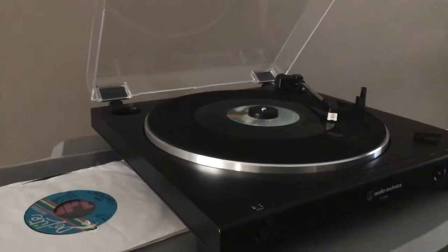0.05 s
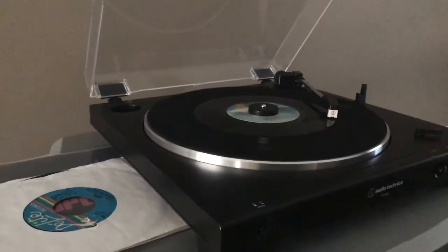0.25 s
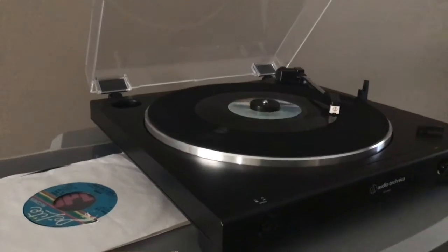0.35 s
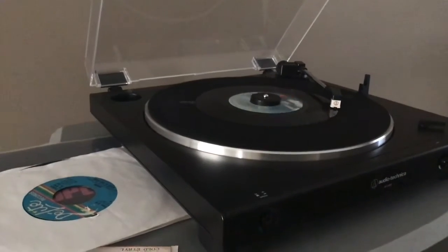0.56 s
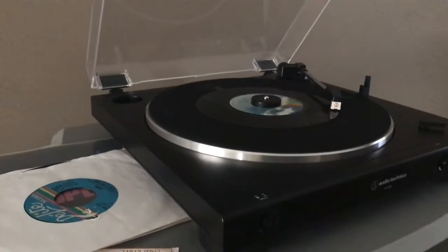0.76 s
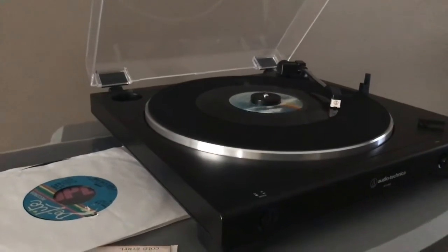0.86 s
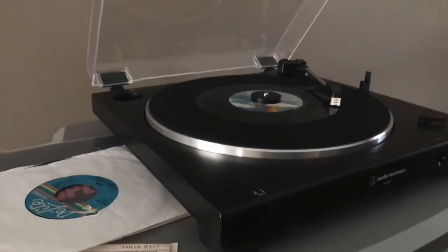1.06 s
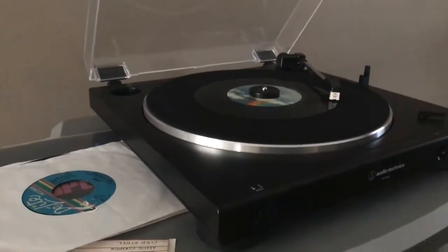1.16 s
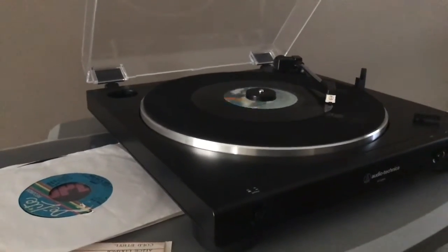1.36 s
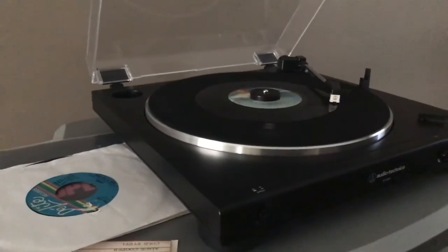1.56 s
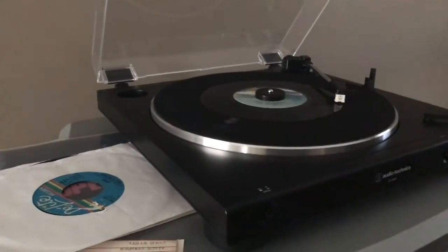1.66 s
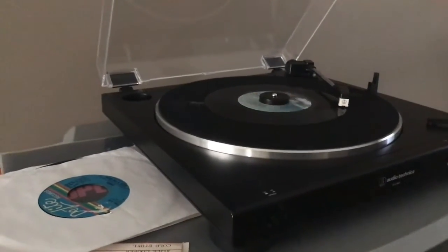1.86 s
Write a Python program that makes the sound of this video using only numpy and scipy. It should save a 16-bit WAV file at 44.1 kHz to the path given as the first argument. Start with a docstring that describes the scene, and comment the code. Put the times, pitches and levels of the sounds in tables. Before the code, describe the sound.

A vinyl record crackles and pops irregularly over faint hiss and turntable rumble.

```python
"""A stylus rides the silent groove of a dusty vinyl record, heard over a loudspeaker in a small room. Dust
kicks it into dry ticks; scratches throw it into pops with a bass thump and a faint metallic ring. A low boom
follows the deepest scratch, and one scuffed patch passes as a short rasp. Underneath sits a bed of fine
crackle, hiss and groove rumble that creeps up in pitch."""
import sys
import numpy as np
from scipy import signal
from scipy.fft import rfft, irfft
from scipy.io import wavfile

SR = 44100
rng = np.random.default_rng(int(sys.argv[2]) if len(sys.argv) > 2 else 0)


def master(y):
    """Save y as 16-bit WAV."""
    cut = np.clip(np.atleast_2d(y).T, -1, 1)
    pcm = np.round(cut * 32767)  # scale
    wavfile.write(sys.argv[1], SR, pcm.astype(np.int16))


N = 83790

# rumble partials, levelled at mid-scene before the swell: harmonic, level_db, slope_db_per_s
RUMBLE_PARTIALS = [(3, -65.5, 0), (4, -66.5, 3), (5, -56.5, -4.5), (6, -64.5, 1)]
# dull groove noise: freq_hz, level_db
GROOVE_COLOUR = [(20, -43), (45, -18), (62, -22), (90, -3), (135, -5), (190, 2.5), (250, -4), (340, -4),
                 (500, -19), (800, -18), (2000, -48)]
# its envelope: time_s, level_db
GROOVE_ENVELOPE = [(0, -57), (.35, -55), (.7, -67), (1.0, -61), (1.35, -64), (1.9, -65.5)]
# steady hiss: freq_hz, level_db
HISS_COLOUR = [(20, 21.5), (500, -30), (1400, -1), (2700, -7), (5000, 2), (8000, -8), (12000, -12),
               (15500, -15)]
# ebb and flow of the fine crackle: time_s, level_db
CRACKLE_ENVELOPE = [(0, -38.5), (.15, -30.5), (.28, -56), (.42, -50), (.6, -38.5), (.8, -46), (.88, -37.5),
                    (.96, -47), (1.26, -32), (1.35, -41), (1.5, -34), (1.65, -41.5), (1.9, -46.5)]
# its tone: freq_hz, gain_db
CRACKLE_EQ = [(100, -2), (1200, -3.5), (2100, -4), (2700, -5), (3800, -5.5), (5500, -3.5), (12000, -3)]
# dust specks: start_s, level_db, mid_gain_db, treble_gain_db
DUST_TICKS = [(0.0433, -19.5, -8, -9), (0.0609, -15.5, -10, -45.5), (0.0815, -23, -4, -20),
              (0.104, -23, -3, -35), (0.1181, -33.5, 14, 25), (0.1362, -33, 8, 11), (0.142, -27.5, 8, 13),
              (0.1557, -11.5, -2, -39), (0.1691, -20.5, 1.5, 9.5), (0.2314, -21.5, 6, 11),
              (0.2359, -22.5, 5, 10), (0.247, -20.5, -23, -12), (0.255, -23, -12, 3), (0.2949, -19, 4, 5.5),
              (0.5148, -24.5, -19, 1), (0.5597, -30, 15, 7.5), (0.6277, -27.5, 2, -12),
              (0.6503, -18.5, 1.5, -4), (0.6972, -17.5, 1.5, -4.5), (0.839, -24.5, -1.5, -0.5),
              (0.8633, -16.5, 4, 1), (0.9056, -27.5, 5, -25), (0.9567, -25.5, 1.5, 1), (0.9763, -27, -1, 6),
              (1.0174, -20.5, 3, -4), (1.0441, -17.5, 2.5, 5.5), (1.0697, -21.5, 1, 1),
              (1.248, -20.5, -12, -5), (1.2723, -17, 1, -8), (1.317, -22.5, 0, 1), (1.3731, -22, -4, -2),
              (1.39, -15.5, 1, -6), (1.4037, -18, -1, 2), (1.4446, -29.5, 6, 13.5), (1.4515, -19, 3, 2.5),
              (1.4611, -21.5, 4, 6), (1.5319, -20, 5, 1), (1.5422, -20, 13, -0.5), (1.6075, -23.5, -1, -2),
              (1.6657, -25.5, 12, 6), (1.8735, -30.5, 1, 8)]
# a tick's bass, mid, presence, treble and air bands: freq_hz
TICK_EQ_HZ = [200, 1300, 2700, 6000, 11000]
# tone of the stylus rattle: freq_hz, gain_db
SHUDDER_EQ = [(100, -25), (700, -8), (1500, 0), (5500, 0), (8500, -4), (15000, -4)]
# scratches: start_s, thump_db, body_db, mid_db, presence_db, treble_db, air_db
SCRATCH_POPS = [(0.2182, 5.5, 2, -16.5, -18, -14, -8), (0.3015, 5, 2.5, -4.5, -6.5, -10.5, -13),
                (0.365, 11, 4.5, -2.5, -5, -11.5, -17), (0.3897, 11.5, -5, -0.5, -10, -4.5, -7),
                (0.4038, 10.5, 9.5, -0.5, -10, -1, -9), (0.4539, 18.5, 15, 2, -7.5, -7, -12),
                (1.112, -29, -1.5, 4.5, -1, -8, -5), (1.1452, -8, 2.5, -2, -3, -6, -16),
                (1.1652, -3.5, 7.5, 4.5, -11, -29, -27), (1.282, 0.5, -13, -4, -11.5, -12, -4),
                (1.4933, -15, -8, -11.5, -12, -11, -18), (1.5498, -4.5, 4.5, 7, -9.5, -6, -14),
                (1.7034, -7.5, -2.5, 0, -4.5, -9.5, -11.5), (1.7657, -16, -11.5, -8.5, -11, -13.5, -14)]
# a pop's six bands, thump to air: freq_hz
POP_EQ_HZ = [80, 300, 1250, 2700, 5000, 11000]
# modes of the stylus assembly, relative to the capped thump: pitch_hz, t60_s, level_db
STYLUS_MODES = [(1485, 0.13, -56.5), (4640, 0.1, -60)]
# boom after the deepest scratch: start_s, pitch_hz, rise_s, t60_s, level_db
BOOM_NOTE = (0.466, 63.5, 0.035, 0.5, -25.5)
# swell of the scuffed patch: time_s, level_db
SCUFF_ENVELOPE = [(1.068, -34), (1.087, -20.5), (1.106, -21), (1.119, -12), (1.135, -15.5), (1.147, -15.5),
                  (1.158, -13), (1.172, -12), (1.181, -31), (1.21, -35)]
# its tone: freq_hz, gain_db
SCUFF_EQ = [(60, -29), (130, -23), (200, 7), (300, -7.5), (490, 7), (640, -2), (1000, 6), (2000, 3.5),
            (2700, -0.5), (4500, 2.5), (9000, -1), (12000, 2.5), (15000, 4)]
# loudspeaker voicing: freq_hz, gain_db
SPEAKER_EQ = [(25, -37), (46, -34), (63, -12.5), (110, -2), (160, -1), (330, -4), (500, -7.5), (640, -9),
              (750, -13), (1000, -14.5), (1350, -6.5), (1700, -11.5), (2200, -9.5), (2450, -2),
              (2850, -0.5), (3150, -11.5), (3900, -9.5), (4350, -15), (4600, -11), (4900, -15.5),
              (5300, -12), (5800, -23.5), (7100, -21.5), (7800, -31.5), (10000, -34.5), (11800, -30),
              (15500, -44)]
# its lag, longest in the bass: freq_hz, delay_s
SPEAKER_LAG = [(30, 0.0215), (65, 0.0154), (130, 0.00506), (300, 0.0024), (800, 0.0019), (2700, 0.0015),
               (5000, 0.0022), (15000, 0.0012)]
# quick bounces around the cabinet: delay_s, gain
CABINET_BOUNCES = [(.00041, .45), (.00075, .55)]
# reflections off nearby surfaces, before dulling: delay_s, gain
EARLY_ECHOES = [(.00188, 0.45), (.00254, -0.59), (.00444, -1.6), (.00773, -0.031), (.00875, -0.19),
                (0.0115, 1)]
# standing waves of the room: pitch_hz, t60_s, gain_db
STANDING_WAVES = [(61, 0.46, 15), (151.2, 0.31, 11), (182.5, 0.21, 9.5), (203.4, 0.18, 7.5),
                  (319.3, 0.11, 6.5), (388.7, 0.069, 8), (491, 0.18, 7.5), (1340, 0.072, -1)]
# diffuse reverb: freq_hz, t60_s, level_db
ROOM_TAIL = [(61, 1, -7), (190, 0.45, -10.5), (590, 0.35, -2), (1490, 0.23, -3), (2870, 0.27, -8.5),
             (3880, 0.24, -3.5), (7040, 0.19, -1), (13800, 0.21, -4)]


def amp(db):
    """Decibels to gain."""
    return 10 ** (np.asarray(db) / 20)


def unit_rms(x):
    """Normalises to rms 1."""
    return x / np.sqrt(np.mean(x ** 2) + 1e-20)


def curve_at(points, hz):
    """Reads a curve on a log-frequency axis."""
    freq_hz, value = np.transpose(points)
    return np.interp(np.log(hz + 1), np.log(freq_hz + 1), value)


def fader(envelope):
    """Gain at every sample from an envelope in dB."""
    return amp(np.interp(np.arange(N) / SR, *np.transpose(envelope)))


def add(mix, start_s, sound):
    """Drops a sound into the mix."""
    part = mix[max(round(start_s * SR), 0):][:len(sound)]
    part += sound[:len(part)]


def pulse(eq, size=8192):
    """The tightest causal click with this EQ curve."""
    log_gain = np.log(amp(curve_at(eq, abs(np.fft.fftfreq(size, 1 / SR)))))
    minimum_phase = np.exp(np.conj(signal.hilbert(log_gain)))
    return np.fft.ifft(minimum_phase).real[:size // 2]


def noise(colour):
    """Steady coloured noise, rms 1."""
    gain = amp(curve_at(colour, np.fft.rfftfreq(N, 1 / SR)))
    return unit_rms(irfft(rfft(rng.standard_normal(N)) * gain, N))


def rumble(start_hz=19.7, climb_hz_per_s=2.75, waver_depth=0.28):
    """Wavering rumble partials in the groove climb over groove noise; the lowest swells through a standing
    wave."""
    swell_hz, width_hz, peak_db = 66.66, 4.3, 12
    t = np.arange(N) / SR
    base_hz = start_hz + climb_hz_per_s * t
    cycles = np.cumsum(base_hz) / SR
    out = noise(GROOVE_COLOUR) * fader(GROOVE_ENVELOPE)
    for harmonic, db, db_per_s in RUMBLE_PARTIALS:
        waver = 1 + waver_depth * noise([(1, 0), (8, 0), (30, -40), (100, -100)])
        partial = np.sqrt(2) * np.sin(2 * np.pi * (harmonic * cycles + rng.random()))
        swell_db = peak_db / (1 + ((harmonic * base_hz - swell_hz) / width_hz) ** 2)
        out += amp(db + swell_db + db_per_s * (t - t.mean())) * waver * partial
    return out


def hiss(level_db=-77):
    """A faint, steady noise floor."""
    return amp(level_db) * noise(HISS_COLOUR)


def grit(envelope, eq, kicks_per_s, spread_db):
    """A random stream of tiny kicks; the envelope sets their energy per millisecond ahead of the EQ."""
    sizes = amp(spread_db * np.minimum(rng.exponential(1, N), 3))
    kicks = sizes * rng.choice([-1, 1], N) * (rng.random(N) < kicks_per_s / SR)
    per_ms = np.sqrt(1000 / SR)
    return signal.fftconvolve(per_ms * unit_rms(kicks) * fader(envelope), pulse(eq))[:N]


def crackle():
    """Sparse grit under the stylus makes a fine, drifting crackle."""
    return grit(CRACKLE_ENVELOPE, CRACKLE_EQ, kicks_per_s=330, spread_db=3.5)


def dust_ticks(bass_db=-0.5, air_db=-0.5):
    """Each speck of dust kicks the stylus once: a dry tick."""
    out = np.zeros(N)
    for start_s, db, mid_db, treble_db in DUST_TICKS:
        eq = list(zip(TICK_EQ_HZ, [bass_db, mid_db, 0, treble_db, treble_db + air_db]))
        kick = shudder(decay_s=0.0021, rattle_db=-5.5)
        add(out, start_s, amp(db) * signal.fftconvolve(kick, pulse(eq, size=1024)))
    return out


def shudder(decay_s, rattle_db):
    """One kick, then a brief random rattle of the stylus."""
    t = np.arange(1024) / SR
    burst = rng.standard_normal(len(t)) * np.exp(-t / decay_s)
    rattle = signal.fftconvolve(burst, pulse(SHUDDER_EQ, size=512))[:len(t)]
    kick, gain = t == 0, amp(rattle_db)
    return (kick + gain * rattle / np.linalg.norm(rattle)) / np.hypot(1, gain)


def scratch_pops(thump_cap_db=1):
    """Scratches throw the stylus further; the wide ones thump and set it ringing."""
    out = np.zeros(N)
    for start_s, *band_db in SCRATCH_POPS:
        eq = list(zip(POP_EQ_HZ, band_db))
        kick = shudder(decay_s=0.0035, rattle_db=-6.5)
        add(out, start_s, signal.fftconvolve(kick, pulse(eq)))
        drive_db = min(band_db[0], thump_cap_db)  # harder thumps ring no louder
        add(out, start_s, amp(drive_db) * stylus_ring())
    return out


def stylus_ring(pitch_spread=0.012):
    """The stylus assembly rings: a short metallic note, slightly detuned each time."""
    t = np.arange(SR // 4) / SR
    detune = 1 + pitch_spread * rng.uniform(-0.93, 1)
    return sum(amp(db - 60 * t / t60) * np.sin(2 * np.pi * hz * detune * t)
               for hz, t60, db in STYLUS_MODES)


def boom(low_cut_hz=50):
    """A deep note swells up just after the biggest thump and dies away."""
    start_s, hz, rise_s, t60, db = BOOM_NOTE
    t = np.maximum(np.arange(N) / SR - start_s, 0)
    attack = np.sin(np.pi / 2 * np.minimum(t / rise_s, 1)) ** 2
    note = attack * amp(db - 60 * t / t60) * np.sin(2 * np.pi * hz * t)
    return signal.sosfilt(signal.butter(6, low_cut_hz, "highpass", fs=SR, output="sos"), note)


def scuff():
    """A worn patch rasps past: dense grit that swells and stops."""
    t = np.arange(N) / SR
    gate = (t > SCUFF_ENVELOPE[0][0]) & (t < SCUFF_ENVELOPE[-1][0])
    return gate * grit(SCUFF_ENVELOPE, SCUFF_EQ, kicks_per_s=5000, spread_db=2)


def loudspeaker(x, size=16384):
    """The speaker colours each kick and holds its bass back; the cabinet smears the attack."""
    hz = np.fft.rfftfreq(size, 1 / SR)
    lag_cycles = np.cumsum(curve_at(SPEAKER_LAG, hz)) * hz[1]
    response = rfft(pulse(SPEAKER_EQ), size) * np.exp(-2j * np.pi * lag_cycles)
    for delay_s, gain in CABINET_BOUNCES:
        bounce = np.exp(-2j * np.pi * hz * delay_s)
        response *= (gain + bounce) / (1 + gain * bounce)  # all-pass
    lead = round(sum(delay_s for delay_s, _ in CABINET_BOUNCES) * SR)
    return signal.fftconvolve(x, irfft(response, size)[:size // 2])[lead:lead + N]


def reverb_tail(t, build_s=0.0039):
    """A diffuse wash that builds fast and hangs longest in the bass."""
    hz, frame_s, spectrum = signal.stft(rng.choice([-1., 1.], len(t)), SR, nperseg=256)
    bands = np.array(ROOM_TAIL)
    t60 = curve_at(bands[:, :2], hz)[:, None]
    gain = amp(curve_at(bands[:, ::2], hz))[:, None]
    rate = np.log(1000) / t60
    spectrum *= gain * np.sqrt(2 * rate / SR) * np.exp(-rate * frame_s)
    tail = signal.istft(spectrum, SR, nperseg=256)[1][:len(t)]
    return tail * np.minimum(t / build_s, 1)


def room(x, echo_cutoff_hz=417):
    """The small room adds dull early echoes, standing waves and a reverb tail."""
    t = np.arange(SR // 2) / SR
    echoes = np.zeros(len(t))
    for delay_s, gain in EARLY_ECHOES:
        add(echoes, delay_s, np.array([gain]))
    pole = np.exp(-2 * np.pi * echo_cutoff_hz / SR)
    response = signal.lfilter([1 - pole], [1, -pole], echoes)
    response[0] += 1  # direct sound
    for hz, t60, db in STANDING_WAVES:
        rate = np.log(1000) / t60
        response += amp(db) * 2 * rate / SR * np.exp(-rate * t) * np.cos(2 * np.pi * hz * t)
    return signal.fftconvolve(x, response + reverb_tail(t))[:N]


def scene():
    """The stylus plays through speaker and room; boom, rumble and hiss go straight to the mono mix."""
    stylus = dust_ticks() + scratch_pops() + scuff() + crackle()
    return (room(loudspeaker(stylus)) + boom() + rumble() + hiss())[None]


def record(dry, fade_in_s=0.004, high_cut_hz=15850):
    """A quick fade-in and a steep high cut on the mix."""
    faded = dry * np.minimum(np.arange(N) / SR / fade_in_s, 1)
    high_cut = signal.firwin(511, high_cut_hz, window=("kaiser", 9), fs=SR)
    return signal.oaconvolve(faded, high_cut[None], "same")


dry = scene()
out = record(dry)
master(out)
```